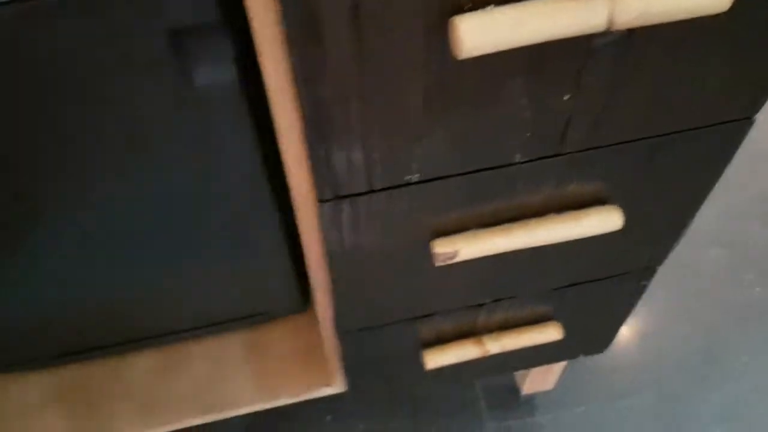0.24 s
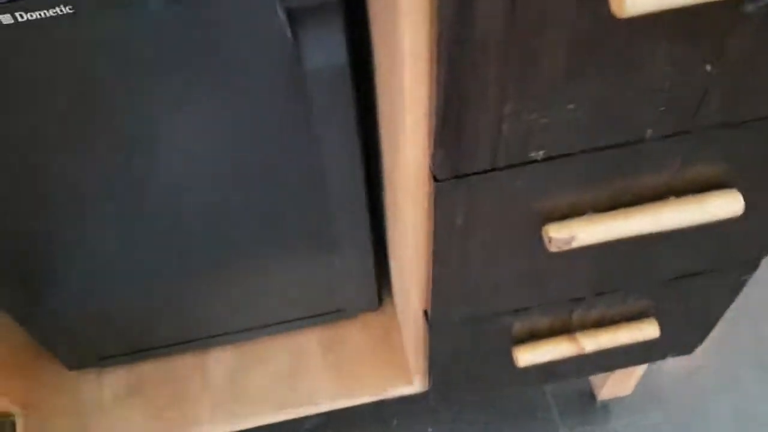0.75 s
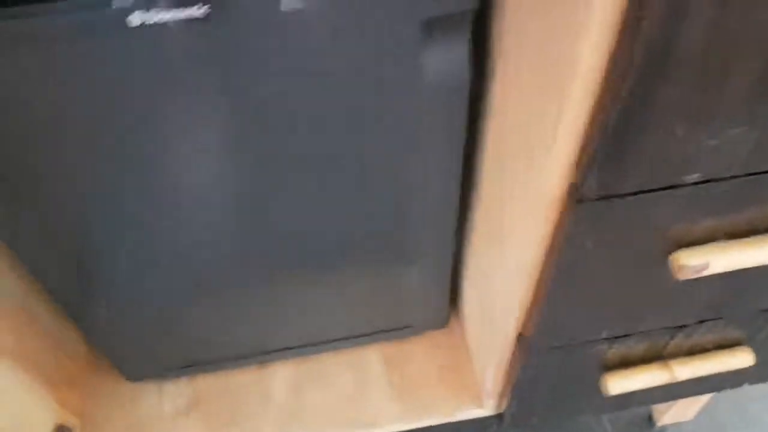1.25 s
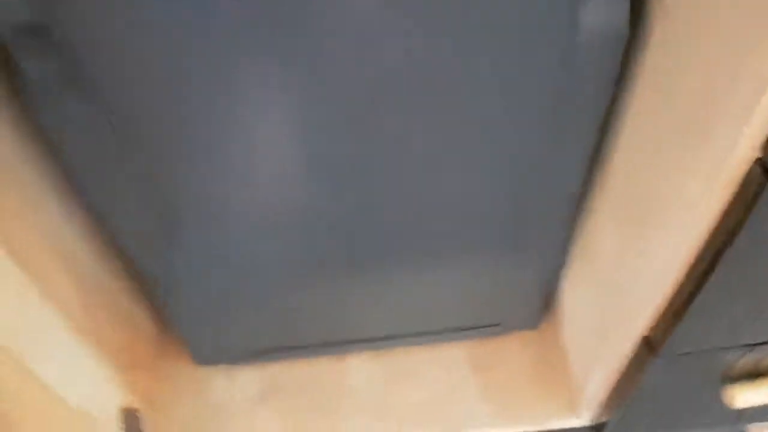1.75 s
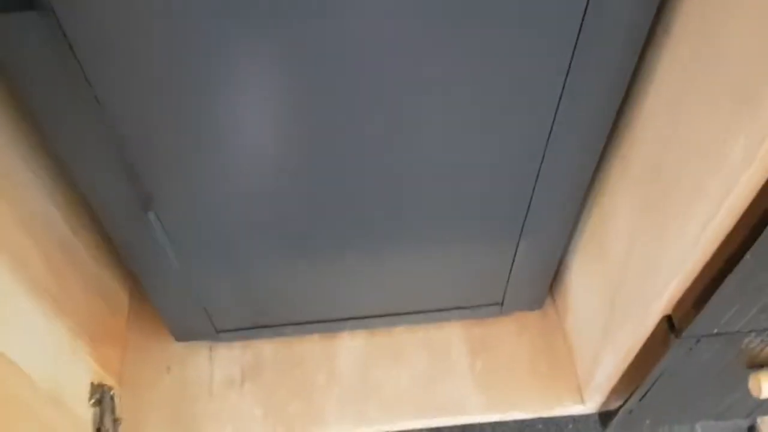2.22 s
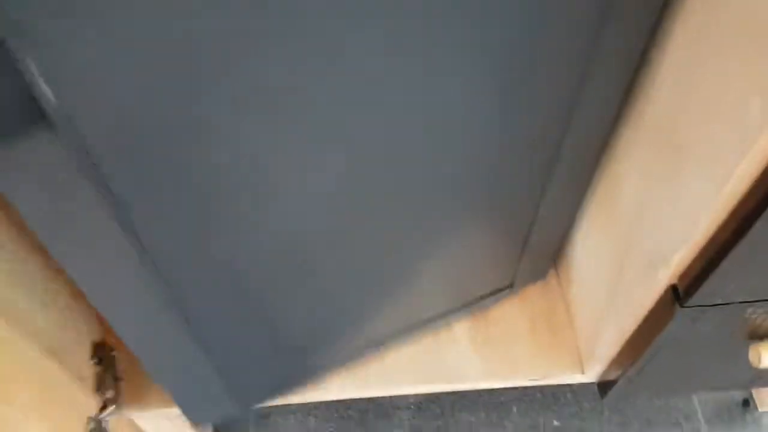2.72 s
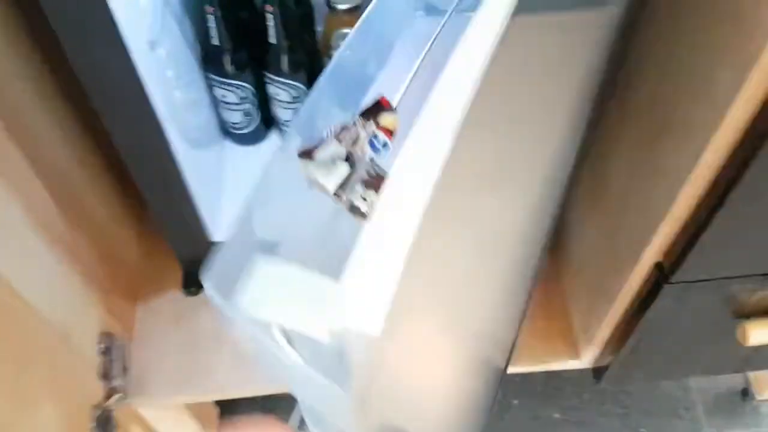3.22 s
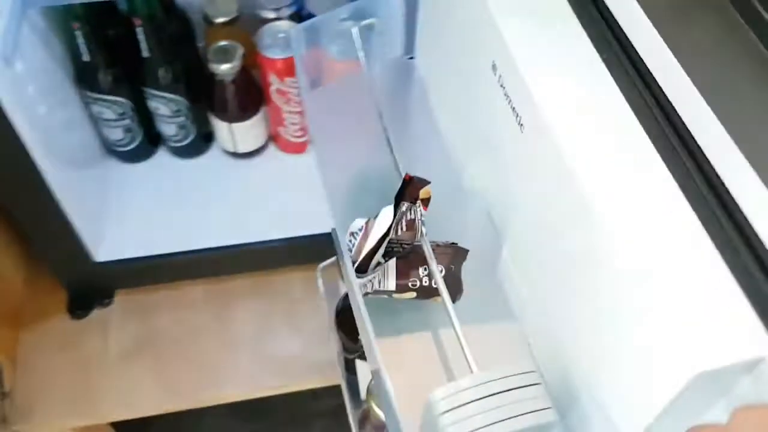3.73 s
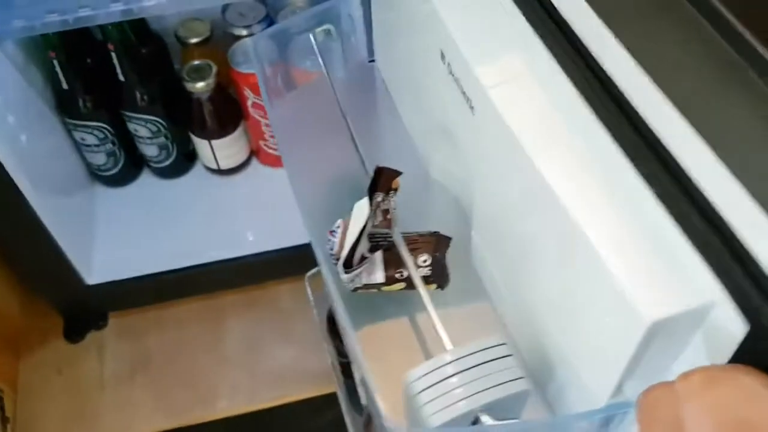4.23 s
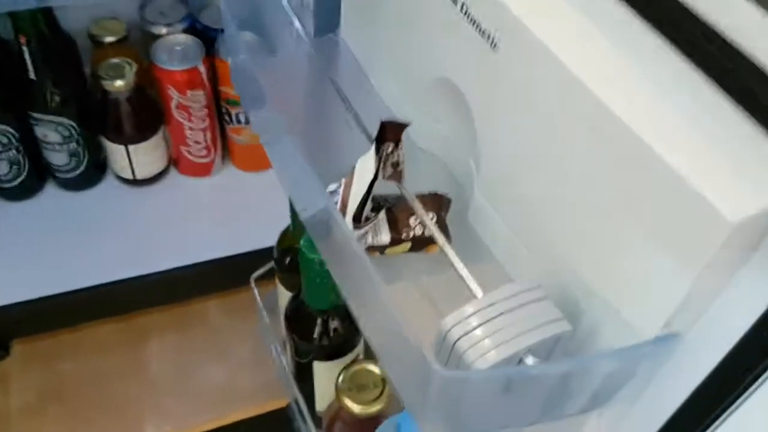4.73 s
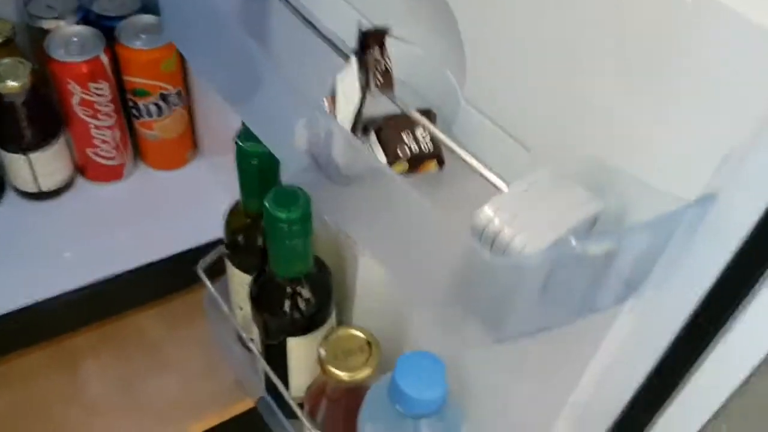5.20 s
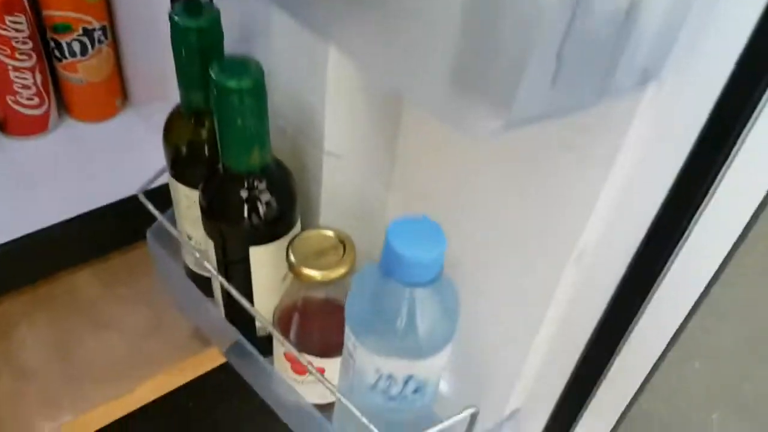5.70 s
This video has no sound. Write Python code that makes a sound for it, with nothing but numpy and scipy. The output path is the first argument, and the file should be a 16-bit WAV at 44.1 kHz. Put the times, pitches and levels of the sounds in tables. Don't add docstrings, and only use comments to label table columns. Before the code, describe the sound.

A quiet, small room with short reverberation, heard by a close handheld stereo microphone; soft low handling rumble and sleeve rustle run underneath. A very faint hinge whine comes near 0.15 s. From 0.65 to 1.0 s a dry hinge creaks in quick jerks, with a dull knock, then a small latch clicks at 1.07 s. Between 1.4 and 1.6 s a wooden drawer stutters on its runner in rapid hollow knocks, ending with a firmer one. A soft thud follows at 2.5 s. At 2.62 s a fridge catch snaps, the rubber seal tears in short tugs, squeaks and pops free at 2.88 s. Faint glass touches and cloth accompany the swing. At 4.05-4.15 s the door stops hard and its light plastic shelf rattles. Bottles clink brightly at 4.31 s, again more softly at 4.34 s, ringing briefly. Sleeve rustles and sparse, weakening ticks follow until about 5.7 s, leaving near silence.

```python
import sys
import numpy as np
from scipy import signal
from scipy.fft import rfft, irfft, next_fast_len
from scipy.io import wavfile
from scipy.ndimage import uniform_filter1d

SR = 44100
rng = np.random.default_rng(int(sys.argv[2]) if len(sys.argv) > 2 else 0)


def unload_wav(signal):
    wavfile.write(
        sys.argv[1],
        SR,
        np.round(np.clip(np.atleast_2d(signal).T, -1, 1) * 32767).astype(np.int16),
    )


def to_linear_factor(level_db):
    exponent = np.asarray(level_db, float) / 20
    return 10 ** exponent


N = 262819


def evened(x):
    return x / np.sqrt(np.mean(x ** 2) + 1e-20)


def read(points, hz):
    f, value = np.transpose(points)
    return np.interp(np.log(hz + 1), np.log(f + 1), value)


def curve(rows, t):
    s, *columns = np.transpose(rows)
    return [np.interp(t, s, c) for c in columns]


def during(rows, t):
    return (t > rows[0][0]) & (t < rows[-1][0])


def add(mix, s, sound):
    part = mix[:, round(s * SR):][:, :sound.shape[-1]]
    part += sound[..., :part.shape[1]]


def resonate(x, hz, width):
    return signal.lfilter(*signal.iirpeak(hz, max(hz / width, .3), SR), x)


def above(x, hz):
    return signal.sosfilt(signal.butter(N=2, Wn=hz, btype="high", fs=SR, output="sos"), x)


def below(x, hz):
    return signal.sosfilt(signal.butter(N=6, Wn=hz, fs=SR, output="sos"), x)


def treble(x, smoothing):
    return signal.lfilter([1], [1, -smoothing], above(above(x, 1600), 1600))


def sides(x, pan_db):
    gain = to_linear_factor(np.array([[.5], [-.5]]) * pan_db)
    return x + above(x, 600) * (gain - 1)


def swells(rows, t, floor_db):
    power = to_linear_factor(2 * floor_db) + 0 * t
    for s, db, rise, fall in rows:
        away = np.maximum((s - t) / rise, (t - s) / fall)
        power = power + to_linear_factor(2 * (db - SWELL_DB * away))
    return 10 * np.log10(power)


SWELL_DB = 12

# pitch_hz, likeness (1 is the same)
SAME = [(60, 0.88), (180, 1), (550, 0.66), (1650, -0.026), (4970, 0.14), (15000, -0.32)]
# pitch_hz, level_db
LEAN = [(60, 0.5), (240, 0.5), (950, -3), (3770, -6), (15000, 0)]
# pitch_hz, lead_radians
LEAD = [(60, .1), (200, 0.35), (600, .3), (1500, 0)]


def hush(spectrum, level_db, size, patchy_db, gust_db):
    hop = size // 4
    frames, hz = N // hop + 6, np.fft.rfftfreq(size, 1 / SR)
    a, b, c, d, patches = rng.standard_normal((frames, len(hz), 5)).T
    patches = uniform_filter1d(patches, size=6, axis=0)
    patches = evened(uniform_filter1d(patches, size=8, axis=1))
    gusts = evened(uniform_filter1d(rng.standard_normal(frames), size=3))
    same = np.clip(read(SAME, hz), -1, 1)[:, None]
    left = a + 1j * b
    right = same * left + np.sqrt(1 - same ** 2) * (c + 1j * d)
    z = np.array([left, right])
    z *= to_linear_factor(read(spectrum, hz)[:, None] + patchy_db * patches + gust_db * gusts)
    half = np.array([.5, -.5])[:, None, None]
    z *= to_linear_factor(half * read(LEAN, hz)[:, None])
    z *= np.exp(1j * half * read(LEAD, hz)[:, None])
    noise = signal.istft(z, nperseg=size, noverlap=size - hop)[1][:, :N]
    return to_linear_factor(level_db) * evened(noise)


# time_s, grip_db (hand on the housing), bustle_db (body and sleeve)
STIR = [(0, -52.5, -57.5), (.45, -54.5, -60), (.8, -56, -57.5), (1.04, -49, -53.5), (1.3, -53, -59.5),
        (1.6, -46, -51.5), (1.8, -50.5, -55.5), (2.06, -48.5, -56), (2.3, -50, -55.5), (2.5, -45.5, -51.5),
        (2.68, -49.5, -49.5), (2.96, -65, -57), (3.45, -64.5, -51.5), (3.72, -65, -54.5),
        (4.02, -59.5, -62), (4.8, -52.5, -58), (5.3, -54.5, -62), (5.96, -67.5, -65.5)]
# pitch_hz, level_db (per Hz)
RUMBLE = [(12, -33), (20, -4), (54, 5.5), (161, 2), (192, 1), (377, -5), (414, -25.5), (500, -5),
          (650, -53.5), (1100, -120)]
# pitch_hz, level_db (per Hz)
AIR = [(120, -20.5), (200, -5.5), (312, -7), (382, 2), (535, -3.5), (628, -1), (1270, -9.5), (1850, -10.5),
       (2000, -7.5), (2650, -17), (5000, -28.5), (6500, -52), (11000, -120)]
# pitch_hz, level_db (per Hz)
RUSTLE = [(1470, 0), (2500, 2), (6350, -6.5), (8600, -6.5), (9510, -11), (14000, -8.5), (15500, -7),
          (16000, -38)]
# peak_s, level_db, rise_s, fall_s
CLOTH = [(.67, -62.5, 0.19, 0.12), (1.1, -59.5, 0.055, 0.2), (1.49, -52, 0.051, 0.075),
         (3.46, -61.5, 0.21, .03), (3.6, -62, 0.012, 0.054), (2.18, -62.5, 0.14, 0.072),
         (2.9, -48.5, 0.12, 0.19), (4.2, -51.5, 0.068, 0.11), (4.4, -47.5, 0.11, 0.21),
         (4.59, -48, 0.088, 0.047), (4.71, -46.5, 0.069, 0.08), (5.52, -61, .03, 0.021)]
# peak_s, level_db, rise_s, fall_s
WAFTS = [
    (1.6, -37.5, 0.049, 0.047),
    (2.95, -43, 0.23, 0.28),
    (4.25, -49.5, 0.22, .7),
]


def stir():
    t = np.arange(N) / SR
    low_db, bustle_db = curve(STIR, t)
    air_db = swells(WAFTS, t, bustle_db)
    rustle_db = -68 + 0.73 * (bustle_db + 58)
    cloth_db = swells(CLOTH, t, rustle_db)
    rumble = hush(RUMBLE, low_db, size=1024, patchy_db=2.2, gust_db=1.0)
    air = hush(AIR, air_db, size=512, patchy_db=1.5, gust_db=-1.0)
    rustle = hush(RUSTLE, cloth_db, size=256, patchy_db=0.5, gust_db=0.6)
    return rumble + air + rustle


def tone(rows, t, waver):
    wobble = 1 + waver * evened(uniform_filter1d(rng.standard_normal(N), size=150))
    return 2 * np.pi * np.cumsum(curve(rows, t)[0] * wobble) / SR


# time_s, pitch_hz, level_db
WHINE = [(.12, 838, -99), (.135, 810, -49.5), (.16, 826, -63), (.2, 862, -53.5), (.25, 829, -68),
         (.31, 806, -64)]
# start_s, level_db, pitch_hz,
# length_s
SWAYS = [(1.507, -50, 65, 0.1), (1.366, -41, 159, .08), (1.13, -43.5, 159, 0.052), (1.195, -47, 147, .05),
         (2.667, -60, 60, 0.089), (4.078, -47.5, 83, 0.079), (4.388, -46, 69, 0.2), (4.739, -45, 73, 0.096),
         (4.86, -51, 130, 0.072), (5.211, -56.5, 87, 0.18), (0.403, -53.5, 99.3, 0.21),
         (0.761, -54, 98, 0.17)]


def shudders():
    t = np.arange(N) / SR
    whine = to_linear_factor(curve(WHINE, t)[1]) * np.sin(tone(WHINE, t, waver=0.049))
    out = sides(whine * during(WHINE, t), pan_db=-1.5)
    for s, db, hz, length in SWAYS:
        u = np.arange(0, length, 1 / SR)
        add(out, s, to_linear_factor(db) * np.sin(2 * np.pi * hz * u) * np.sin(np.pi * u / length))
    return out


def touch(rows, ms, push_db, steady):
    return [(s, db, crack_db, push_db - steady * (db + 30.5), ms) for s, db, crack_db in rows]


DULLING = 0.13

# pitch_hz, width_hz
PANELS = [
    (248, 300),
    (158, 102),
    (156, 58),
    (213.7, 11.6),
    (186, 39),
    (90, 78),
]


def blows(events, body, panel, loose_db, soft_hz, snap, pan_db):
    out, t = np.zeros((2, N)), np.arange(6000) / SR
    hardest_db = max(e[1] for e in events)
    snap_now = t == t[8]
    for s, db, crack_db, push_db, ms in events:
        grit, share = rng.standard_normal(len(t)), rng.normal(0, 2, len(body))
        contact = (grit - snap * snap_now) * np.exp(-1000 * t / max(ms, .3))
        contact = contact * np.minimum(t / 0.00088, 1)
        soft = below(contact, soft_hz * to_linear_factor(DULLING * (db - hardest_db)))
        ring = sum(to_linear_factor(d + e) * resonate(soft, hz, w) for (hz, w, d), e in zip(body, share))
        dull = above(soft, 240)
        crack = treble(contact * ~snap_now, .8)
        push = resonate(-np.exp(-t / 0.00055), *panel)
        push = resonate(push, panel[0], 5.5 * panel[1])
        hit = ring / abs(ring).max() + to_linear_factor(loose_db) * dull / abs(dull).max()
        hit = hit + to_linear_factor(crack_db) * crack / abs(crack).max()
        hit = hit + to_linear_factor(push_db) * push / abs(push).max()
        add(out, s, to_linear_factor(db) * sides(hit, pan_db))
    return out


def pings(rows, pan_db, cycles=1.4):
    out, t = np.zeros((1, N)), np.arange(6000) / SR
    for s, db, hz, t60 in rows:
        fade = to_linear_factor(db - 60 * t / t60)[None] * np.minimum(t * hz / cycles, 1)
        add(out, s, fade * np.sin(2 * np.pi * hz * t))
    return sides(out, pan_db)


def slips(rows, ring, pan_db, cycles):
    rung = [(row[0], row[1] + db, hz, t60) for row in rows for db, hz, t60 in ring]
    return -pings(rung, pan_db, cycles)


# (bright part, above about 1.6 kHz)
HINGE = [(.131, -58, -24.5), (.659, -52.5, -4), (.814, -50, -25), (.840, -38, -13), (.848, -48, -18),
         (.856, -39.5, -11), (.865, -42, -15), (.874, -39, -15), (.893, -34, -8), (.904, -43, -7),
         (.916, -35.5, -8), (.938, -39.5, -18), (.949, -45, -30), (.964, -41, -13), (.989, -55, -25)]
# pitch_hz, width_hz, level_db
HINGE_BODY = [(535, 93, 1.5), (836, 53, 10), (1090, 40, 0.5), (1450, 100, -4), (2040, 120, -10),
              (2300, 38, -21)]
# level_db, pitch_hz, fade_s (to -60 dB)
HINGE_RING = [(-3, 820, 0.035), (-12, 1000, 0.05), (-9, 1385, 0.026), (-6, 2400, 0.023), (-12, 2100, 0.025)]


def hinge():
    jerks = blows(touch(HINGE, ms=6.5, push_db=-7, steady=0.091), HINGE_BODY, PANELS[0],
                  loose_db=-3.0, soft_hz=2670, snap=5.4, pan_db=-13.5)
    return to_linear_factor(-1.5) * jerks + slips(HINGE, HINGE_RING, pan_db=-11, cycles=2.4)


# start_s, level_db (peak), pitch_hz, fade_s (to -60 dB)
WOOD_PINGS = [(.815, -47.5, 833, 0.15), (1.1, -44, 316, 0.065), (.953, -33.5, 460, 0.046),
              (.928, -33, 730, 0.035), (1.076, -41, 4240, 0.027), (1.074, -44, 2500, 0.06),
              (1.076, -45, 1250, .03), (.8925, -42, 2100, .015), (.8935, -40, 1450, .02),
              (1.565, -28, 356, 0.066), (1.587, -43, 2200, 0.018), (1.5862, -43, 4150, 0.011),
              (1.589, -47, 5650, 0.0089), (1.5895, -26, 1420, .015), (1.4, -29, 172, .12),
              (1.59, -40, 830, 0.036), (1.5, -35.5, 140, 0.13), (1.3, -44, 626, 0.03),
              (1.3, -40, 130, 0.12), (1.197, -43, 750, 0.037), (1.198, -42, 210, 0.12),
              (1.218, -42, 169, 0.1), (1.1, -43, 165, 0.28)]


def loose_wood():
    return pings(WOOD_PINGS, pan_db=-6)


# start_s, level_db (peak), crack_db
THUDS = [(.930, -30, -18), (1.134, -40.5, -15), (1.155, -48.5, -24), (1.195, -46, -10), (1.219, -55, -17),
         (2.434, -53, -24), (2.517, -36, -16), (4.068, -64, -34), (4.34, -41, -28)]


def thuds():
    return blows(touch(THUDS, ms=7.5, push_db=-6.5, steady=0.92), DRAWER_BODY, PANELS[1],
                 loose_db=-4.0, soft_hz=1535, snap=4.4, pan_db=-6.5)


# start_s, level_db (peak), crack_db
LATCH = [
    (1.068, -50, -10),
    (1.075, -38, -3),
    (1.094, -48.5, -17),
]
# pitch_hz, width_hz, level_db
LATCH_BODY = [(780, 190, 7), (1240, 140, 5.5), (1905, 93, 15.5), (2140, 87, 11), (4240, 310, -9)]


def latch():
    return blows(touch(LATCH, ms=5.2, push_db=-2.5, steady=0.37), LATCH_BODY, PANELS[1],
                 loose_db=-9.0, soft_hz=4400, snap=1.5, pan_db=-22.5)


# start_s, level_db (peak)
DRAWER = [(1.374, -65), (1.394, -43), (1.404, -34.5), (1.414, -34), (1.427, -24.5), (1.439, -27),
          (1.451, -21.5), (1.464, -23.5), (1.477, -22.5), (1.490, -21), (1.504, -21.5), (1.519, -23),
          (1.534, -29.5), (1.549, -21.5), (1.566, -50), (1.589, -18), (1.615, -42)]
# pitch_hz, width_hz, level_db
DRAWER_BODY = [(298, 140, 12.5), (509.5, 17, 16), (710, 107, 8.5), (1110, 134, -39), (1350, 23.6, -9),
               (2000, 110, -10.5), (2300, 96, -22)]
# level_db, pitch_hz, fade_s (to -60 dB)
RUNNER_RING = [(-8, 158, 0.087), (-3.5, 346, 0.045), (-6, 518, 0.041), (0, 808, 0.024), (-10, 1346, 0.023),
               (-18.5, 2000, 0.021), (-25, 2390, 0.043), (-28, 3100, 0.013), (-32, 4800, .012)]


def drawer():
    knocks = [(s, db, -25 + 0.45 * (db + 27)) for s, db in DRAWER]
    box = blows(touch(knocks, ms=8.0, push_db=-1.5, steady=0.97), DRAWER_BODY, PANELS[2],
                loose_db=-16, soft_hz=2380, snap=14.0, pan_db=-10.0)
    early = [(s - .0012, db) for s, db in DRAWER]
    return to_linear_factor(-4.5) * box + slips(early, RUNNER_RING, pan_db=-15.5, cycles=2.65)


# start_s, level_db (peak), crack_db
CATCH = [
    (2.621, -47, 2),
    (2.6445, -29, -6),
    (2.659, -39, 6),
]
# pitch_hz, width_hz, level_db
CATCH_BODY = [(1390, 220, -6), (4050, 420, 0)]


def catch():
    return blows(touch(CATCH, ms=2.0, push_db=-32, steady=0), CATCH_BODY, PANELS[3],
                 loose_db=-10, soft_hz=7500, snap=1.5, pan_db=-8)


# start_s, level_db (peak), crack_db
DOOR = [(2.668, -49, -21), (2.689, -23.5, -22), (2.709, -40, -6), (2.739, -29, -15), (2.8805, -16, -9.5),
        (2.885, -17, -30), (2.929, -40, -17)]
# pitch_hz, width_hz, level_db
DOOR_BODY = [(363, 47, 9.5), (610, 210, 0), (990, 74, -40), (1330, 260, -9.5), (2120, 43, -19),
             (4030, 950, -16.5)]
# start_s, level_db
# (peak), pitch_hz, fade_s (to -60 dB)
DOOR_PINGS = [(2.647, -33, 1270, 0.024), (2.658, -38, 4100, 0.027), (2.662, -31, 1400, .06),
              (2.705, -34, 2300, .05), (2.735, -32, 1260, 0.035), (2.735, -25, 325, 0.095),
              (2.772, -30, 1110, 0.033), (2.783, -29.5, 2137, 0.044), (2.794, -27.5, 2100, 0.037),
              (2.8805, -7, 1660, 0.0025), (2.882, -28, 2230, 0.031), (2.884, -26, 365, 0.04),
              (2.645, -31, 3700, .015), (2.6455, -34, 4400, .012), (2.672, -29, 676, .05),
              (2.697, -31, 1184, 0.065), (2.7, -38, 176, .08), (2.758, -28, 213, .07),
              (2.764, -30, 740, 0.046), (2.788, -32, 606, 0.059), (2.885, -29, 218.4, 0.1),
              (2.895, -33, 357, .15), (3.047, -45, 2019, 0.12), (3.642, -52, 2020, 0.1)]


def door():
    knocks = blows(touch(DOOR, ms=5.6, push_db=-9.5, steady=0.53), DOOR_BODY, PANELS[3],
                   loose_db=-29, soft_hz=3700, snap=11.6, pan_db=-4.0)
    return knocks + pings(DOOR_PINGS, pan_db=-9)


# start_s, length_s, tearing_db, hiss_db, flutter_db
TUGS = [
    (2.659, 0.074, -37, -42, -31.5),
    (2.739, 0.022, -57, -66, -30),
    (2.771, 0.043, -40, -39, -32),
    (2.813, 0.065, -45.5, -55, -34.5),
]


def tugs(t):
    grip_s, let_go_s, hiss_edge_s, silent_db = 0.018, 0.0064, 0.036, -120
    s, length, tear_db, hiss_db, flutter_db = np.transpose(TUGS)[:, :, None]
    outside = np.maximum(np.maximum((s - t) / grip_s, (t - s - length) / let_go_s), 0)
    peak = (s + 0.48 * length)[:, 0]
    hiss = [(p, db, hiss_edge_s, hiss_edge_s) for p, db in zip(peak, hiss_db[:, 0])]
    flutter = [(p, db, 0.027, 0.026) for p, db in zip(peak, flutter_db[:, 0])]
    tearing = (tear_db - SWELL_DB * outside).max(0)
    return tearing, swells(hiss, t, silent_db), swells(flutter, t, silent_db)


# pitch_hz, width_hz, level_db
SEAL_BODY = [(1145, 310, 6), (1450, 510, 16), (2100, 130, 0), (2500, 70, -20), (2870, 160, -27),
             (3770, 170, 1), (4100, 140, 0), (5300, 350, -39)]
# time_s, pitch_hz, level_db, octave_db
SQUEAK = [(2.77, 1040, -60, -50), (2.79, 1060, -46, -43), (2.81, 1030, -46, -52), (2.84, 1085, -41, -48),
          (2.876, 1140, -39, -43), (2.882, 1140, -60, -65)]


def seal():
    t = np.arange(N) / SR
    tear_db, hiss_db, flutter_db = tugs(t)
    strength_db = 1.4 * rng.exponential(1, N // 40 + 1).repeat(40)[:N]
    grains = rng.standard_normal(N) * to_linear_factor(strength_db)
    tear = sum(to_linear_factor(d) * resonate(grains, hz, w) for hz, w, d in SEAL_BODY)
    tear = tear + to_linear_factor(-9) * resonate(grains, 1400, 1600)
    flutter = resonate(grains, 345, 89) + to_linear_factor(-3.0) * resonate(grains, 130, 120)
    crisp = grains * to_linear_factor(1.6 * evened(below(grains, 120)))
    hiss = treble(crisp, .5)
    turn = tone(SQUEAK, t, waver=0.0213)
    tone_db, octave_db = curve(SQUEAK, t)[1:]
    catching = np.clip(abs(evened(below(grains, 45))), .55, 1.4)
    squeak = to_linear_factor(tone_db + 3.5) * np.sin(turn)
    squeak = squeak + to_linear_factor(octave_db + 7) * np.sin(2 * turn) * catching
    torn = to_linear_factor(tear_db) * evened(below(tear, 4700)) + to_linear_factor(hiss_db) * evened(hiss)
    torn = torn + to_linear_factor(flutter_db) * evened(below(flutter, 940))
    return sides(torn * (t < SQUEAK[-1][0]) + squeak * during(SQUEAK, t), pan_db=-7.0)


def bottles(events, lines, pan_db):
    out, t = np.zeros((2, N)), np.arange(SR // 2) / SR
    hz, mode_db, t60, beat = np.transpose(lines)[:, :, None]
    for s, db, hard_db in events:
        share, phase, split = rng.standard_normal((3, len(hz), 1))
        level_db = mode_db + .8 * share + hard_db * np.log2(hz / 2000) - 60 * t / t60
        since = t + s - events[0][0]
        twin = .6 * (hz > 4000) * np.sin(2 * np.pi * hz * (1 + .005 * split) * t)
        throb = np.cos(np.pi * beat * since)
        main = np.sin(2 * np.pi * hz * since + 0.37 * phase * 2 * np.pi * hz * 0 + 0.37 * phase)
        ring = (to_linear_factor(level_db) * throb * (main + twin)).sum(0) * np.minimum(t / 0.00037, 1)
        add(out, s, to_linear_factor(db) * sides(ring / abs(ring).max(), pan_db))
    return out


# start_s, level_db (peak), hardness_db (per octave)
NUDGES = [
    (2.909, -45, 6),
    (2.935, -39.5, 5.5),
    (3.0145, -42, 9),
    (3.047, -66, 3),
    (3.598, -55, 1),
    (3.6426, -73, -8),
]
# pitch_hz, level_db, fade_s (to -60 dB), beat_hz
NECKS = [(1954, 0, .75, 0), (2019, -4, .5, 0), (3155, -13, .25, 0), (4075, -23, .2, 0), (4667, -17, .33, 0),
         (6180, -23, .15, 0), (7881, -22, .15, 0)]
# start_s, level_db (peak), hardness_db (per octave)
CLINKS = [
    (4.3138, -14.5, -1),
    (4.3444, -25, 3.5),
    (4.4394, -48, 6),
]
# pitch_hz, level_db, fade_s (to -60 dB), beat_hz (of a close pair)
GLASS = [(1954, -7, .62, 0), (1979, -2, .22, 0), (2018, -7, .5, 0), (2083, -9, .75, 0), (3140, -9, .36, 0),
         (3175, -7, .46, 4.4), (3486, -8, .14, 0), (3526, 0, .36, 5), (4430, -18, .25, 0),
         (4683, -11, .36, 4.6), (4760, -17, .15, 0), (5530, -8, .3, 10.5), (6180, -13, .2, 0),
         (7424, -16, .14, 0), (7910, -15, .14, 0), (8500, -20, .1, 0), (9600, -26, .12, 0),
         (10380, -23, .09, 0), (11320, -23, .17, 0), (12070, -30, .2, 0)]


def glass():
    return bottles(NUDGES, NECKS, pan_db=-2.5) + bottles(CLINKS, GLASS, pan_db=-2.01)


# start_s, level_db (peak), crack_db
SHIFTS = [(3.188, -65, -36), (3.468, -46, -9), (4.035, -35.5, -12), (4.045, -37, 0), (4.278, -35, -37.5),
          (4.294, -29.5, -31.5), (4.314, -23.5, 0), (4.33, -27.5, -8), (4.343, -25.5, -2), (4.364, -41, 4)]
# start_s, level_db (peak), crack_db
SHELF = [(3.52, -45, -29), (3.796, -44, -1.5), (4.053, -18, -27), (4.06, -20, -4.5), (4.067, -19.5, -4.5),
         (4.073, -18, -5), (4.084, -16.5, -27), (4.098, -21, -10), (4.11, -34, -13), (4.121, -21.5, -12),
         (4.134, -30, -8), (4.154, -38, -6)]
# pitch_hz, width_hz, level_db
SHELF_BODY = [(639, 51, 1.5), (627, 49, 8), (749, 64, 11), (974, 120, 3), (1086, 220, -6.5), (1190, 73, -4),
              (1530, 260, 4), (1830, 96, -14), (2230, 49, -11), (2150, 72, -2), (4340, 300, -11)]


def shelf():
    shifts = blows(touch(SHIFTS, ms=14.6, push_db=-40, steady=0.11), SHELF_BODY, PANELS[4],
                   loose_db=-32.0, soft_hz=1440, snap=18.0, pan_db=-5.5)
    rattle = blows(touch(SHELF, ms=8.0, push_db=-36.0, steady=-0.28), SHELF_BODY, PANELS[4],
                   loose_db=-12, soft_hz=4530, snap=7.4, pan_db=-6.5)
    return above(above(shifts + rattle, 280), 280)


# start_s, level_db (peak), pitch_hz, fade_s (to -60 dB)
SHELF_PINGS = [(3.468, -44, 680, .05), (3.795, -41.5, 2180, 0.021), (3.796, -39.5, 1206, 0.024),
               (3.799, -34.5, 627, 0.054), (4.052, -19, 1138, 0.039), (4.057, -19.5, 623, 0.14),
               (4.064, -25, 2310, 0.053), (4.071, -16, 634, 0.052), (4.072, -20, 1585, 0.047),
               (4.073, -20, 2154, 0.089), (4.07, -24.5, 4490, 0.043), (4.0525, -30.5, 3350, .015),
               (4.0528, -25, 1900, .012), (4.071, -25.5, 3490, 0.025), (4.098, -36.5, 4400, .04),
               (4.109, -29, 2900, 0.034), (4.155, -36.5, 5000, .02), (4.136, -27, 1820, 0.016),
               (4.074, -35, 220, 0.14), (4.083, -27.5, 2110, 0.043), (4.084, -31, 1610, 0.046),
               (4.098, -11, 1276, 0.017), (4.1, -22.5, 627, 0.1), (4.111, -28.5, 630, 0.054),
               (4.121, -28.5, 1230, 0.063), (4.132, -23, 1080, 0.038), (4.316, -27.5, 610, 0.18),
               (4.343, -20, 780, 0.051), (4.344, -28, 1350, 0.044), (4.572, -41, 614, 0.069),
               (4.641, -41.5, 749, 0.096), (4.65, -43, 1450, .02), (4.678, -47, 700, 0.053),
               (5.023, -52, 1800, .03), (5.148, -48, 1750, 0.032)]


def loose_shelf():
    return pings(SHELF_PINGS, pan_db=-5.5)


# start_s, level_db (peak), crack_db
TICKS = [(4.535, -39.5, -21), (4.573, -50, -24), (4.642, -38.5, -31), (4.677, -39.5, -3), (4.72, -49, 3),
         (4.805, -41.5, -14), (5.022, -50.5, -12), (5.147, -46.5, -17), (5.235, -49.5, -15),
         (5.321, -53.5, -23), (5.667, -59, -46)]
# pitch_hz, width_hz, level_db
TICK_BODY = [(742, 34, 9), (934, 65, 3), (1340, 450, -11), (1750, 270, -7), (2300, 170, -8.5)]


def ticks():
    return blows(touch(TICKS, ms=3.2, push_db=-9.5, steady=0.28), TICK_BODY, PANELS[5],
                 loose_db=-19.0, soft_hz=2470, snap=2.4, pan_db=-13.0)


# pitch_hz, level_db (side against middle)
WIDE = [(60, -11), (180, -26), (550, -7.5), (1650, -1.5), (4970, 0), (15000, 0)]


def ports(x, taps):
    size = next_fast_len(N + len(taps))
    side = rfft(x.mean(0), size) * rfft(taps, size)
    side = side * to_linear_factor(read(WIDE, np.fft.rfftfreq(size, 1 / SR)))
    return irfft(side, size)[:N] * np.array([[1], [-1]])


def near(x, facing=1):
    taps = rng.standard_normal(1024) * np.exp(-np.arange(1024) / 150)
    return x + facing * ports(x, taps / np.linalg.norm(taps))


# pitch_hz, fade_s (to -60 dB)
ROOM = [(100, 0.78), (500, 0.39), (2000, 0.47), (6000, 0.47), (14000, 0.16)]


def room(x):
    taps = np.zeros((2, SR // 2))
    at = np.arange(200, SR // 2 - 20, 20)
    at = at + rng.integers(0, 20, (2, len(at)))
    np.put_along_axis(taps, at, rng.choice([-1., 1.], at.shape), 1)
    hz, t, z = signal.stft(taps, SR, nperseg=256)
    fade = to_linear_factor(-60 * t / read(ROOM, hz)[:, None])
    tail = signal.istft(z * fade, SR, nperseg=256)[1]
    tail = tail / np.linalg.norm(tail[0])
    return signal.fftconvolve(x.mean(0), tail[0])[:N] + ports(x, tail[1])


def scene():
    wood = hinge() + loose_wood() + thuds() + latch() + drawer()
    fridge = catch() + door() + seal()
    clinks = glass()
    rack = shelf() + loose_shelf() + ticks()
    wet = to_linear_factor(-7.5) * wood + to_linear_factor(-12.5) * fridge + to_linear_factor(-10) * rack + to_linear_factor(-22.0) * clinks
    close = near(wood, facing=-0.83) + near(fridge) + near(rack) + near(clinks)
    return below(close, 14200) + room(wet) + shudders() + stir()


def roll_off(x):
    return signal.sosfilt(signal.butter(12, 16440, fs=SR, output="sos"), x)


def record(dry):
    edge = signal.firwin(601, 15700, window=("kaiser", 9), fs=SR)
    mix = signal.oaconvolve(above(dry, 61), edge[None], "same")
    return roll_off(mix)


dry = scene()
out = record(dry)
unload_wav(out)
```